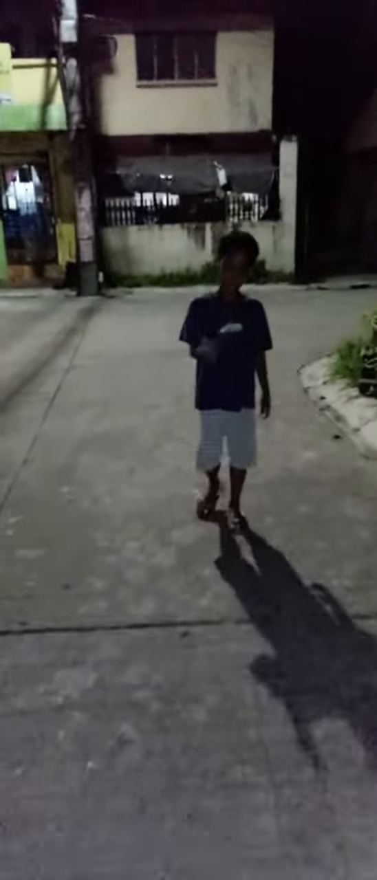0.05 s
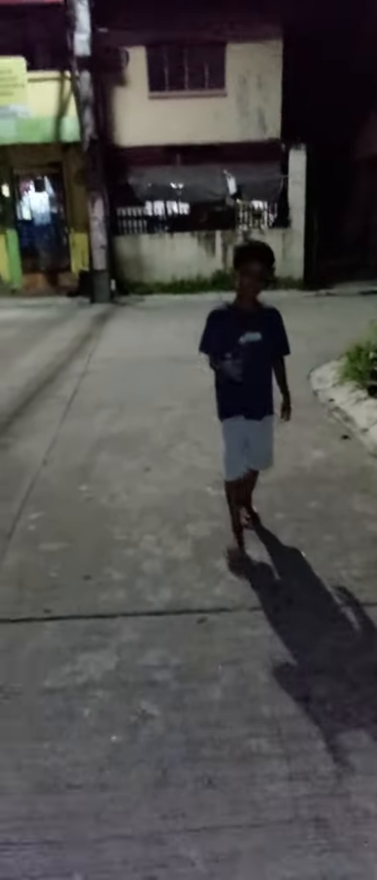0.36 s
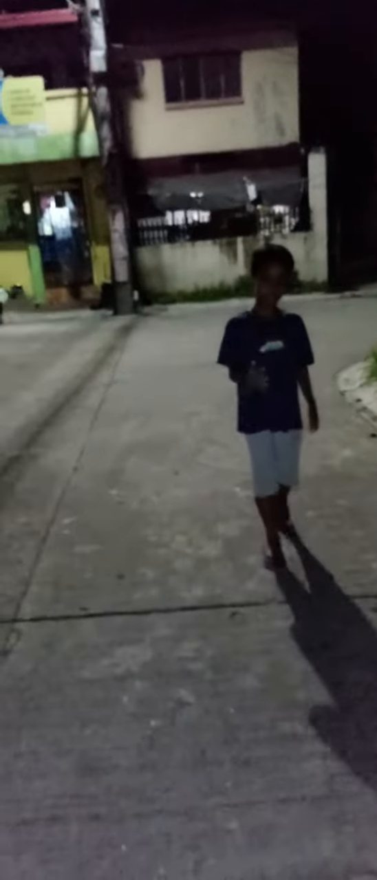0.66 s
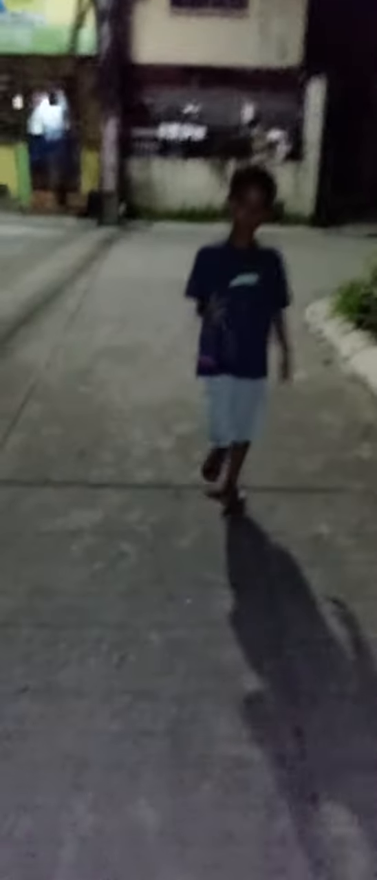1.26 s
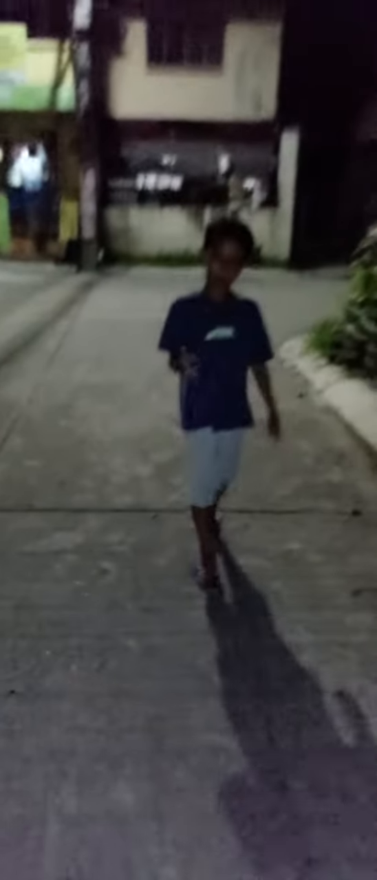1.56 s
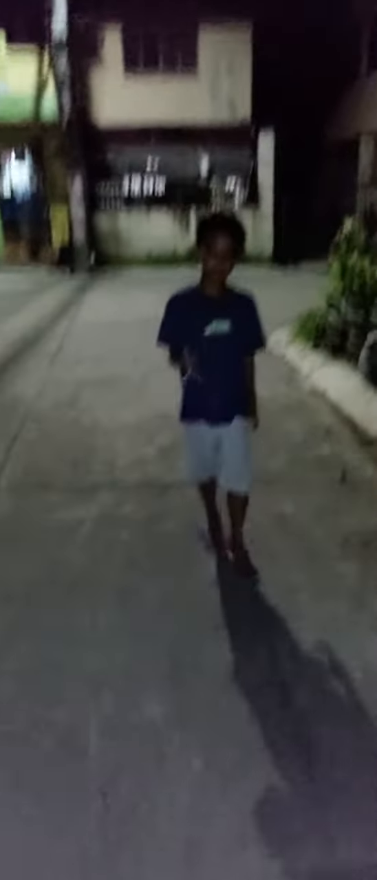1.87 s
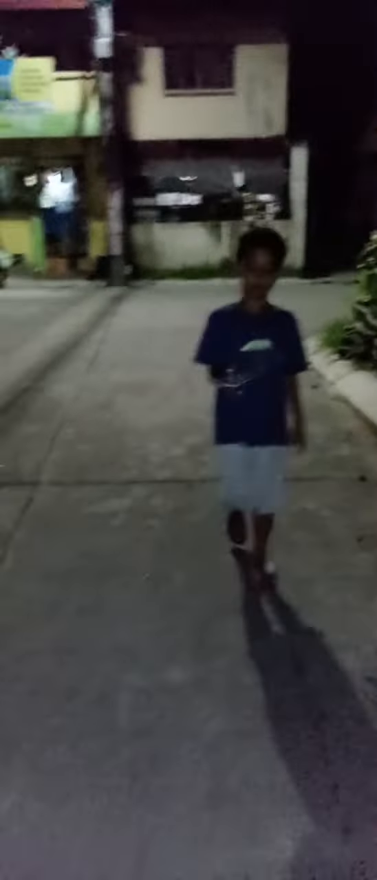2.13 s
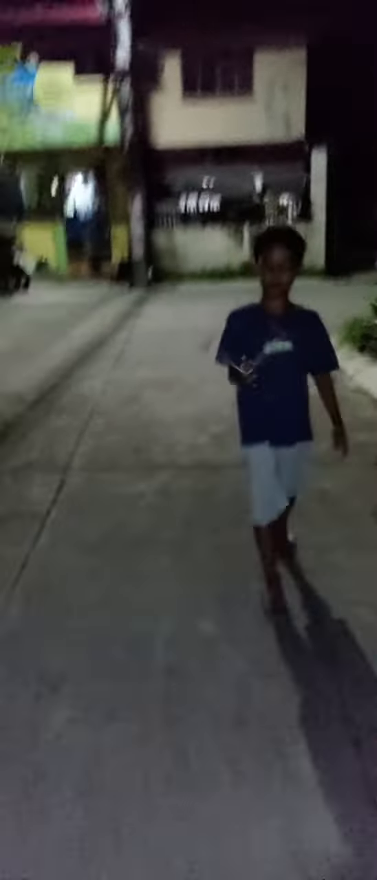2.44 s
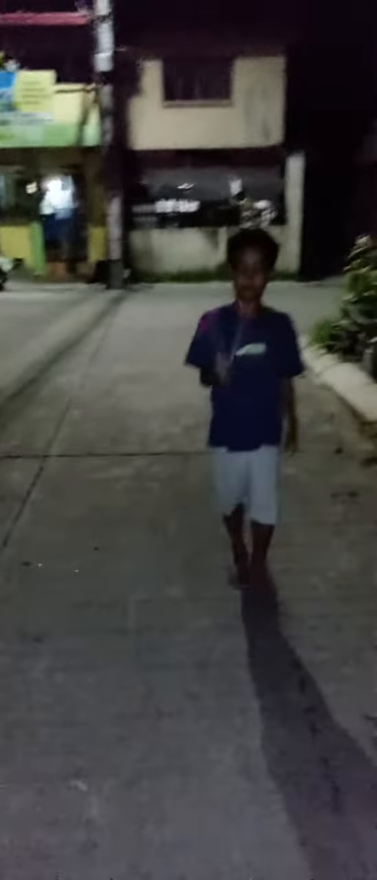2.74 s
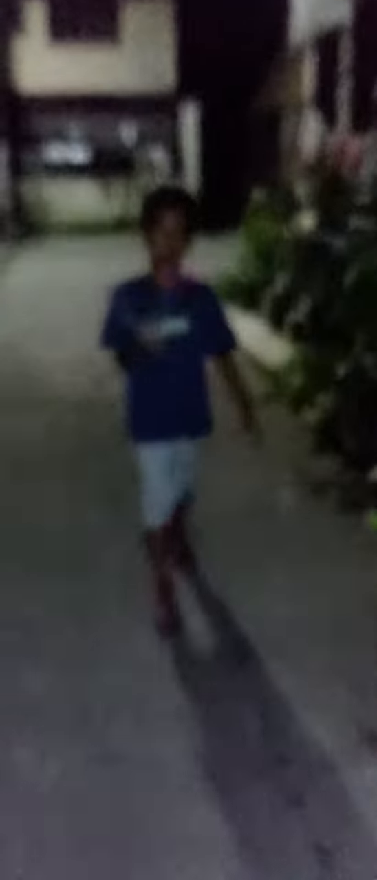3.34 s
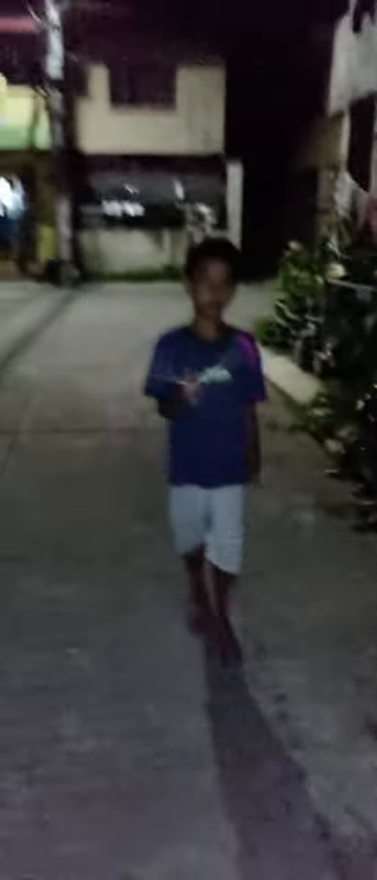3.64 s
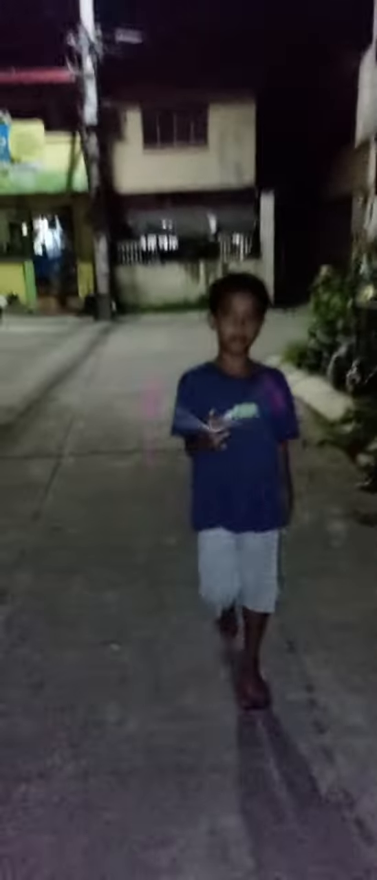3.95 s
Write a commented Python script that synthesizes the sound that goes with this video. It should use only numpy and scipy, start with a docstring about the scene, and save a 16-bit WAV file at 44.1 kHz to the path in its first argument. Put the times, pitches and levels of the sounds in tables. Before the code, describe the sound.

A handheld toy's hard balls crack together in a fast, even rhythm on a quiet street, each hit trailing a short echo. Sandals scuff faintly in the second half, and air softly bumps the microphone.

```python
"""A toy of two hard balls on a string clacks about six times a second, swung by a child walking at night.
Each time the balls meet they ring for a few milliseconds, which we hear as a sharp crack.
The crack bounces off the concrete, slaps back from nearby walls and fades in a wash of street echoes.
Sandals scuff now and then, and air bumps on the microphone.
Behind it all, the distant town rumbles and hums faintly, with a few brief, far-off tones."""
import sys
import numpy as np
from scipy import signal
from scipy.fft import rfft, irfft
from scipy.io import wavfile
from scipy.ndimage import uniform_filter1d, minimum_filter1d

SR = 44100
rng = np.random.default_rng(int(sys.argv[2]) if len(sys.argv) > 2 else 0)


def wav_record(signal):
    """Record a signal, one row per channel, as 16-bit PCM in the file named by sys.argv[1]."""
    frames = np.transpose(np.atleast_2d(signal))
    bounded = np.clip(frames, -1, 1)
    # unit amplitude maps onto the largest positive 16-bit level
    quanta = np.round(bounded * 32767).astype(np.int16)
    wavfile.write(sys.argv[1], SR, quanta)


N = 176400

# The balls hitting each other. Each row: start in seconds, crack level in dB, lower and upper ring
# boosts in dB (before RING_DEPTH scales them), ground bounce delay in milliseconds, relative levels
# in dB of the ground bounce, near wall, far wall and wash, and the wash's hold time in seconds.
BALL_HITS = [(-0.09, 1.3, 0.0, 0.0, 1.8, 0.0, -9.0, -6.0, 6.0, 0.065),
             (0.0556, 2.4, -1.5, -2.9, 1.34, -2.2, -6.3, -3.9, 3.2, 0.065),
             (0.1926, 1.1, 1.4, 1.2, 1.59, 0.6, -6.3, -1.0, 5.8, 0.066),
             (0.3446, 2.9, -1.1, -2.5, 2.04, -3.3, -14.5, -5.0, 2.9, 0.073),
             (0.4823, 1.4, 5.9, 3.5, 1.5, 2.5, -13.9, -5.6, 5.8, 0.069),
             (0.6294, 2.9, -0.4, -1.7, 1.41, 1.4, -9.9, -5.7, 2.0, 0.069),
             (0.7698, 1.5, 2.2, 0.3, 1.36, 3.3, -8.1, -0.6, 6.0, 0.056),
             (0.9155, 2.9, -1.5, 0.8, 1.32, 1.2, -3.8, 0.0, 4.5, 0.067),
             (1.0493, 1.3, 0.8, 3.4, 1.95, 2.9, -8.4, -0.1, 6.7, 0.064),
             (1.2028, 3.8, -3.3, -7.8, 1.86, 1.0, -13.5, -9.3, 1.8, 0.081),
             (1.3441, 1.7, 2.7, 1.0, 1.97, 2.3, -14.1, -6.5, 4.4, 0.084),
             (1.4954, 3.2, -1.3, -3.5, 1.88, -0.5, -5.2, -5.2, 2.3, 0.089),
             (1.6449, 1.1, 2.5, 0.4, 2.0, 1.6, -14.2, -5.8, 5.8, 0.085),
             (1.7997, 3.1, -3.0, -1.8, 1.97, -0.0, -11.7, -12.1, 2.8, 0.076),
             (1.957, 1.2, 6.2, 3.2, 1.36, 2.7, -6.8, -4.9, 4.7, 0.071),
             (2.1298, 3.3, -6.5, 1.0, 1.9, 2.4, -3.4, -1.5, 5.0, 0.048),
             (2.2748, 0.8, 0.6, 2.9, 1.68, 5.2, 3.7, 1.7, 7.6, 0.06),
             (2.4411, 0.8, -3.9, 1.0, 1.54, -1.5, -2.0, -2.1, 4.2, 0.042),
             (2.5998, 1.1, 3.2, 4.4, 1.41, 1.5, -5.4, -3.7, 5.1, 0.064),
             (2.768, 3.0, -2.1, -2.4, 1.54, -0.5, -9.4, -5.5, 2.6, 0.055),
             (2.9284, 1.5, 4.5, 2.3, 1.7, -0.3, -7.1, -5.2, 4.0, 0.056),
             (3.1061, 2.5, -0.5, 0.7, 1.63, -1.9, -9.4, -6.4, 0.9, 0.061),
             (3.2641, 0.6, -2.0, 2.3, 2.4, 5.0, 0.9, 1.1, 6.7, 0.071),
             (3.4354, 1.3, -3.6, -5.0, 1.61, -3.1, -1.4, -4.9, 2.5, 0.044),
             (3.5941, 1.5, 3.1, -0.8, 1.75, -0.5, 1.8, -3.5, 5.6, 0.058),
             (3.7485, 2.6, -4.3, -0.9, 1.68, 0.9, 3.0, -0.2, 5.1, 0.057),
             (3.8947, 1.9, 1.9, 0.8, 1.7, 1.0, 2.3, -0.2, 7.7, 0.049)]
# The ways the balls ring. Each row: pitch in Hz, relative level in dB, seconds to fade by 60 dB.
BALL_RINGS = [(1378, -21.5, 0.0015), (2808, -4.5, 0.0045), (3463, -3.5, 0.0036), (4500, 3.5, 0.002),
              (5800, 1, 0.00049), (6480, -32, 0.0018)]
# The tone colour of the street's echoes. Each row: frequency in Hz, relative level in dB.
ECHO_COLOUR = [(300, -52.5), (600, -34.5), (1000, -21.5), (1500, -13), (2000, -6.5), (2700, -2.5),
               (3700, 1), (4400, -1.5), (5200, -5.5), (6100, -8), (7200, -22.5), (8000, -37)]
# Sandals scraping the ground. Each row: start in seconds, length in seconds, level in dB.
SANDAL_SCUFFS = [(1.93, 0.0051, -44), (2.28, 0.13, -41.5), (2.355, 0.02, -44), (2.425, 0.019, -43.5),
                 (3.17, 0.23, -40.5), (3.315, 0.025, -40), (3.38, 0.076, -51), (3.716, 0.031, -42.5)]
# The tone colour of a scuff. Each row: frequency in Hz, relative level in dB.
SANDAL_COLOUR = [(100, -14), (220, 5), (500, -7), (900, 5), (1500, 4.5), (2500, 12), (4500, 5), (7300, 0),
                 (8200, -44.5)]
# Air bumping the microphone. Each row: start in seconds, length in seconds, level in dB.
AIR_BUMPS = [(.51, 0.055, -56), (1.96, 0.081, -47.5), (2.67, 0.046, -52), (2.79, 0.087, -51),
             (2.925, 0.051, -52), (3.515, 0.054, -52.5), (3.62, 0.084, -53.5), (3.69, 0.22, -54.5),
             (3.91, 0.086, -42)]
# The tone colour of an air bump. Each row: frequency in Hz, relative level in dB.
AIR_COLOUR = [(25, -25), (55, -6.5), (105, 4.5), (160, -15), (300, -28.5), (800, -71.5)]
# Far-off tones. Each row: start and length in seconds, first and last pitch in Hz, level in dB.
FAR_TONES = [(1.726, .07, 830, 803, -59), (1.844, 0.09, 860, 875, -57), (2.184, 0.057, 1150, 990, -54),
             (3.149, 0.11, 1520, 1400, -49)]
# The tone colour of the town's rumble. Each row: frequency in Hz, relative level in dB.
RUMBLE_COLOUR = [(20, -27), (40, -19.5), (62, -0.5), (108, 2), (170, 0), (290, -6), (500, -11), (900, -11),
                 (2000, -22.5), (6000, -25.5), (9000, -55)]
# The town's steady hum. Each row: pitch in Hz, level in dB.
TOWN_HUM = [(107, -76), (189, -74.5), (296, -75.5)]

ECHO_SAMPLES = 16384   # length of the wash; shorter sounds use a fraction of it
LOWER_RING_HZ, MAIN_RING_HZ, UPPER_RING_HZ = 2860, 4400, 5800
RING_DEPTH = 0.94   # how strongly the toy's turning changes its ring
NEAR_WALL_S, FAR_WALL_S, WALL_WANDER_S = 0.011, 0.017, 0.00046
HOLD_DB_PER_S, FADE_DB_PER_S, TREBLE_DB_PER_S = 102, 237.5, 38   # how fast the wash dies away


def toy():
    """Each clack arrives straight through the air, then again off the ground, walls and street."""
    out = np.zeros(N)
    for start, db, lower_db, upper_db, lag_ms, ground_db, near_db, far_db, wash_db, hold_s in BALL_HITS:
        hit = crack(lower_db, upper_db)
        near_s, far_s = np.array([NEAR_WALL_S, FAR_WALL_S]) + WALL_WANDER_S * rng.standard_normal(2)
        add(out, start, from_db(db) * hit)
        add(out, start + lag_ms / 1000, from_db(ground_db) * ground_bounce(hit))
        add(out, start + near_s, from_db(near_db - 1) * wall_slap())
        add(out, start + far_s, from_db(far_db) * wall_slap())
        add(out, start, from_db(near_db - 2) * early_scatter())
        add(out, start, from_db(wash_db + 0.07) * street_wash(lower_db, upper_db, hold_s))
    return out


def crack(lower_db, upper_db):
    """The hard balls collide and ring at several pitches that die away almost at once."""
    t, out = np.arange(ECHO_SAMPLES // 32) / SR, 0
    for k, (hz, db, fade_s) in enumerate(BALL_RINGS):
        level = from_db(db + ring_boost_db(hz, lower_db, upper_db) - 60 * t / fade_s)
        pitch = hz * (1 + .03 * rng.normal())   # no two hits are quite alike
        out = out + (-1) ** k * level * np.sin(2 * np.pi * pitch * t)
    out = signal.sosfilt(signal.butter(6, 7240, fs=SR, output="sos"), out)
    return unit(signal.sosfilt(signal.butter(3, 1325, "high", fs=SR, output="sos"), out))


def ring_boost_db(hz, lower_db, upper_db):
    """As the toy turns, each hit brings out more or less of its lower and upper ring."""
    return RING_DEPTH * np.interp(hz, [LOWER_RING_HZ, MAIN_RING_HZ, UPPER_RING_HZ], [lower_db, 0, upper_db])


def ground_bounce(hit, rough=0.71, copies_per_s=4000, delay_s=0.00064, fade_s=0.002):
    """The concrete mirrors the crack, and smaller copies from close by trail after it."""
    t = np.arange(ECHO_SAMPLES // 32) / SR
    copies = (rng.random(len(t)) < copies_per_s / SR) * rng.choice([-1, 1], len(t))
    out = rough * unit(np.convolve(hit, copies * (t > delay_s) * np.exp(-t / fade_s)))
    add(out, 0, np.sqrt(1 - rough ** 2) * hit)
    return unit(out)


def wall_slap(rough=0.84, fade_s=0.0089):
    """A rough wall throws back a clean crack plus a short smear of noise."""
    t = np.arange(ECHO_SAMPLES // 16) / SR
    out = rough * unit(coloured(rng.standard_normal(len(t)), ECHO_COLOUR) * np.exp(-t / fade_s))
    add(out, 0, np.sqrt(1 - rough ** 2) * crack(0, 0))
    return unit(out)


def early_scatter(start_s=0.0062, end_s=0.015):
    """Small echoes from the kerb and bushes blur into a brief puff of noise."""
    t = np.arange(ECHO_SAMPLES // 8) / SR
    return unit(coloured(rng.standard_normal(len(t)), ECHO_COLOUR) * (t > start_s) * (t < end_s))


def street_wash(lower_db, upper_db, hold_s, echoes_per_s=1500, echo_share=.3, start_s=.015, rise_s=0.0043):
    """Echoes between the house fronts fade gently for hold_s, then faster; the treble goes first."""
    t = np.arange(ECHO_SAMPLES) / SR
    echoes = unit((rng.random(len(t)) < echoes_per_s / SR) * rng.standard_normal(len(t)))
    blur = unit(rng.standard_normal(len(t)))
    # The echoes keep about a third of this clack's own tone colour.
    colour = [(hz, db + 0.31 * ring_boost_db(hz, lower_db, upper_db)) for hz, db in ECHO_COLOUR]
    wash = coloured(np.sqrt(echo_share) * echoes + np.sqrt(1 - echo_share) * blur, colour)
    treble = signal.sosfiltfilt(signal.butter(2, 4900, "high", fs=SR, output="sos"), wash)
    wash = wash - treble * (1 - from_db(-TREBLE_DB_PER_S * t))
    rise = np.clip((t - start_s) / rise_s, 0, 1)
    fall_db = HOLD_DB_PER_S * np.minimum(t, hold_s) + FADE_DB_PER_S * np.maximum(t - hold_s, 0)
    return unit(wash * rise * from_db(-fall_db))


def sandals():
    """Soles rub on the ground in short, scratchy bursts."""
    return swells(SANDAL_SCUFFS, SANDAL_COLOUR)


def air_bumps():
    """Puffs of air push on the microphone and make soft, low thumps."""
    return swells(AIR_BUMPS, AIR_COLOUR)


def far_tones():
    """Brief tones from far away swell and fade while their pitch slides."""
    t, out = np.arange(N) / SR, 0
    for start, length, first_hz, last_hz, db in FAR_TONES:
        progress = np.clip((t - start) / length, 0, 1)
        pitch = first_hz + (last_hz - first_hz) * progress
        out = out + from_db(db) * np.sin(np.pi * progress) * wavering(pitch)
    return out


def town(rumble_db=-61, sway_db=0.66):
    """The distant town makes a faint, gently swaying rumble with a little hum."""
    sway = np.interp(np.arange(N), np.linspace(0, N, 20), rng.standard_normal(20))
    hum = sum(from_db(db) * wavering(hz) for hz, db in TOWN_HUM)
    return hum + from_db(rumble_db - sway_db * sway) * coloured(rng.standard_normal(N), RUMBLE_COLOUR)


def wavering(hz, wobble_hz=35):
    """A tone blurred by its long way through the street; its average (rms) level is about 1."""
    wobble = signal.sosfilt(signal.butter(2, wobble_hz, fs=SR, output="sos"), rng.standard_normal(N))
    phase = 2 * np.pi * np.cumsum(hz + np.zeros(N)) / SR
    return np.sqrt(2) * np.sin(phase + unit(wobble) * np.sqrt(N))


def swells(rows, colour):
    """Short bursts of noise that rise and fall smoothly."""
    t = np.arange(N) / SR
    level = sum(from_db(db) * np.sin(np.pi * np.clip((t - start) / length, 0, 1))
                for start, length, db in rows)
    return level * coloured(rng.standard_normal(N), colour)


def coloured(noise, colour):
    """Make some frequencies of a noise louder than others; its average (rms) level becomes 1."""
    hz, db = np.transpose(colour)
    log_hz = np.log(np.fft.rfftfreq(len(noise), 1 / SR) + 1)
    gain = from_db(np.interp(log_hz, np.log(hz), db))
    return unit(irfft(rfft(noise) * gain, len(noise))) * np.sqrt(len(noise))


def from_db(db):
    """Turn decibels into a number to multiply by."""
    return 10 ** (np.asarray(db) / 20)


def unit(x):
    """Scale a sound to a total energy of one."""
    return x / np.sqrt(np.sum(x ** 2) + 1e-20)


def add(out, start_s, x):
    """Mix x into out from start_s on, dropping whatever does not fit."""
    k = int(round(start_s * SR))
    x, k = x[max(-k, 0):], max(k, 0)
    out[k:k + len(x)] += x[:max(len(out) - k, 0)]


def scene():
    """Mix the toy, sandals, air, town and far tones into one channel."""
    return (toy() + sandals() + air_bumps() + town() + far_tones())[None]


def record(dry, ceiling=.5, window_s=.0015, cutoff_hz=8625):
    """A fast limiter turns down the loudest cracks, then a filter cuts the highest treble."""
    width = int(window_s * SR)
    gain = minimum_filter1d(ceiling / np.maximum(np.abs(dry), ceiling), width)
    limited = dry * uniform_filter1d(gain, width)
    return signal.sosfilt(signal.cheby2(14, 60, cutoff_hz, fs=SR, output="sos"), limited)


dry = scene()
out = record(dry)
wav_record(out)
```